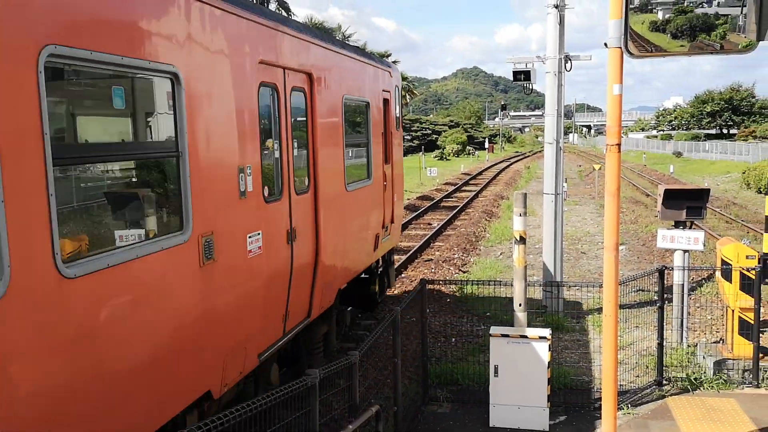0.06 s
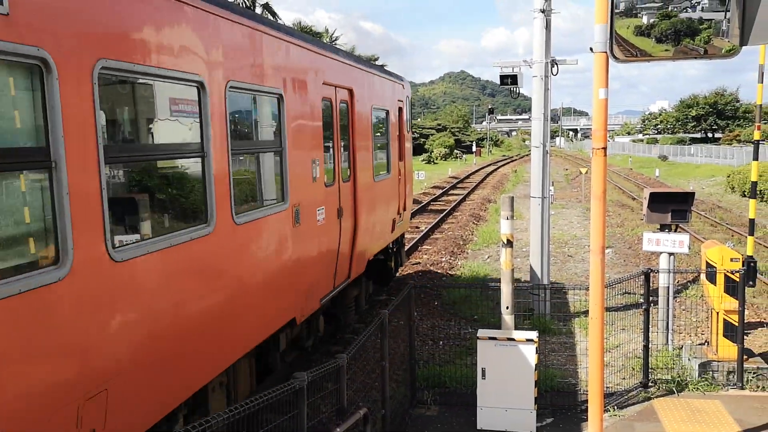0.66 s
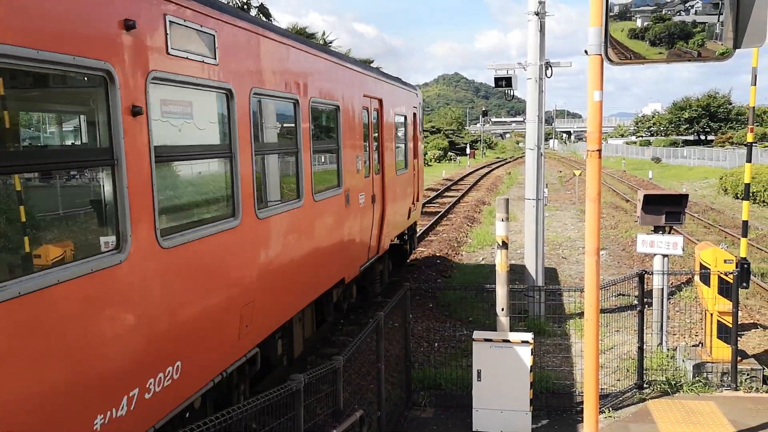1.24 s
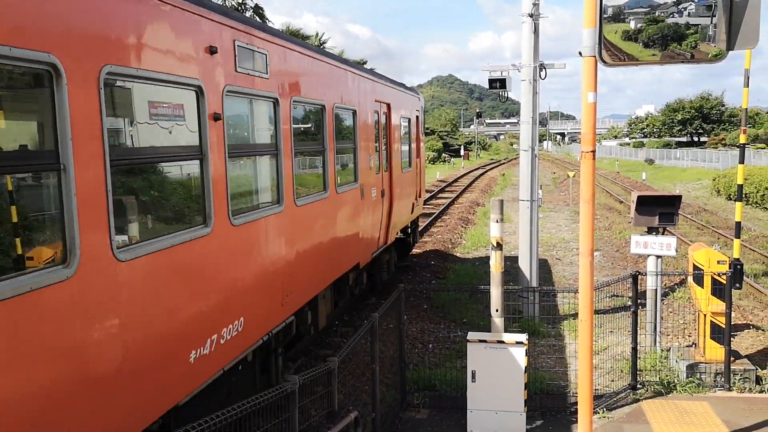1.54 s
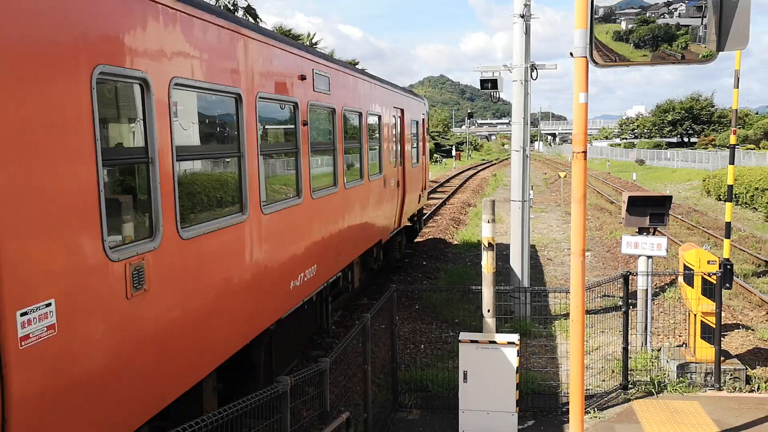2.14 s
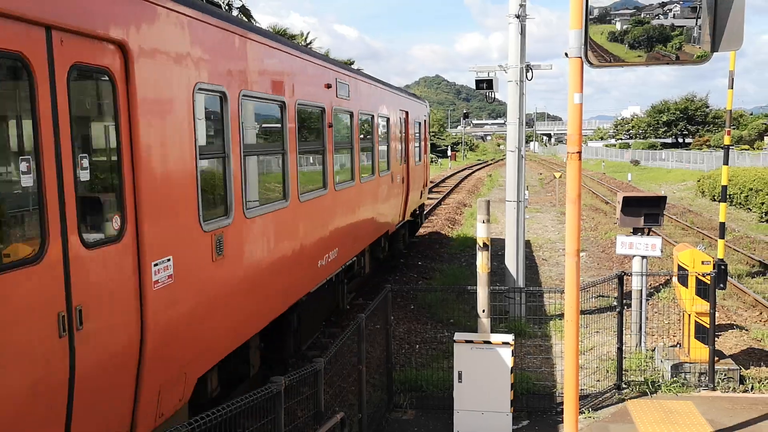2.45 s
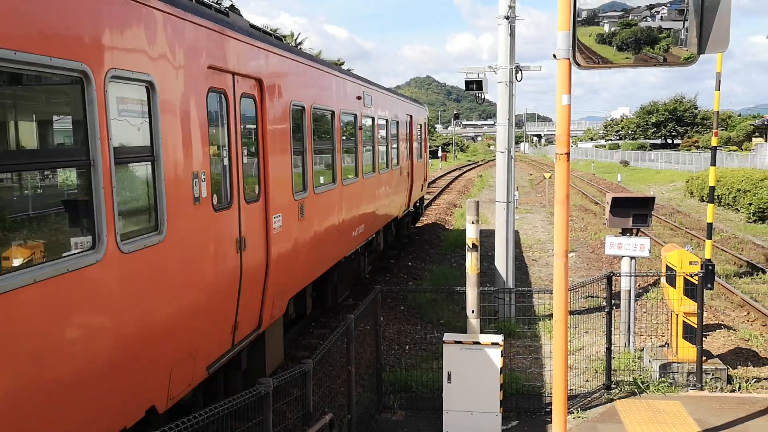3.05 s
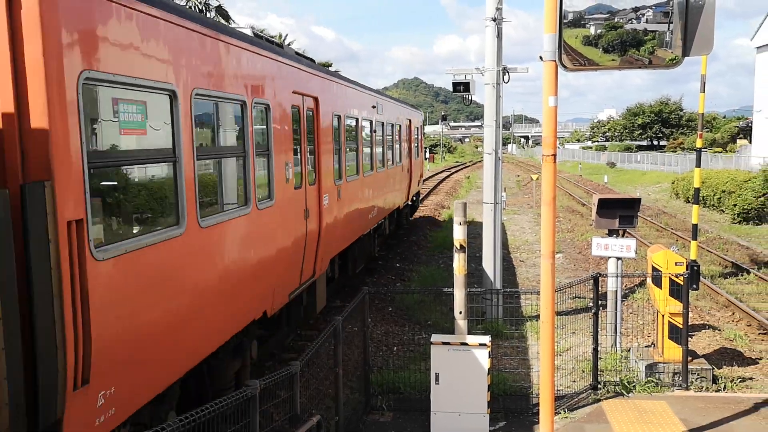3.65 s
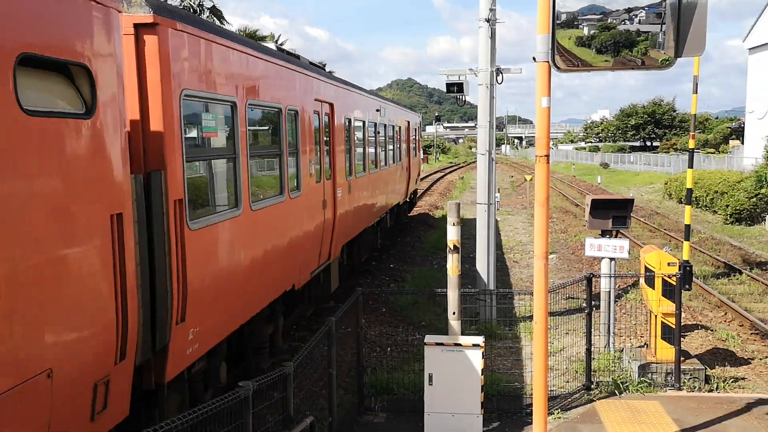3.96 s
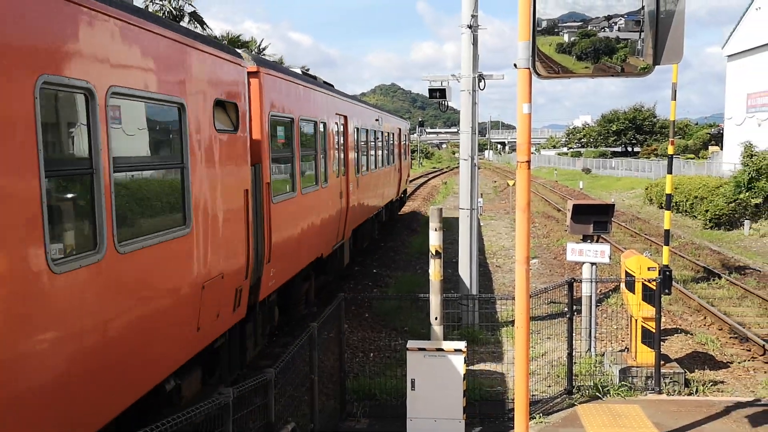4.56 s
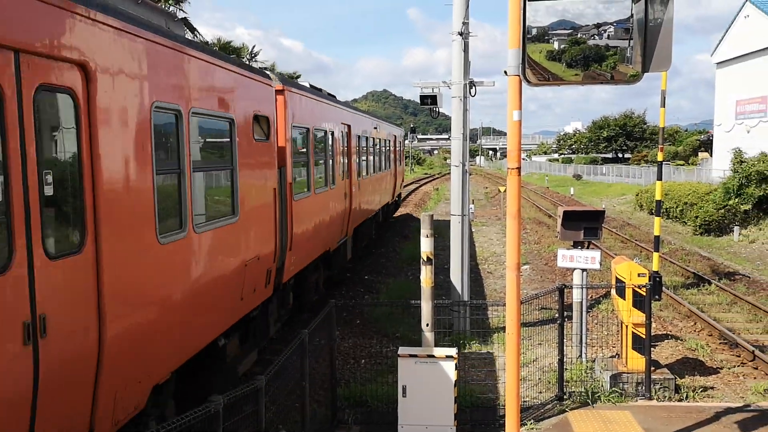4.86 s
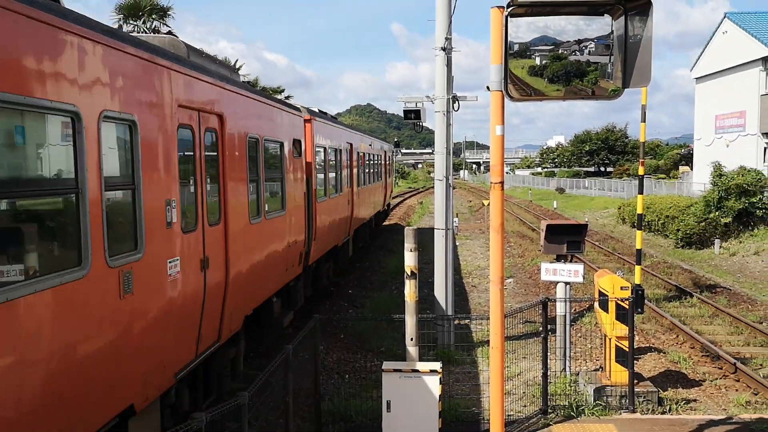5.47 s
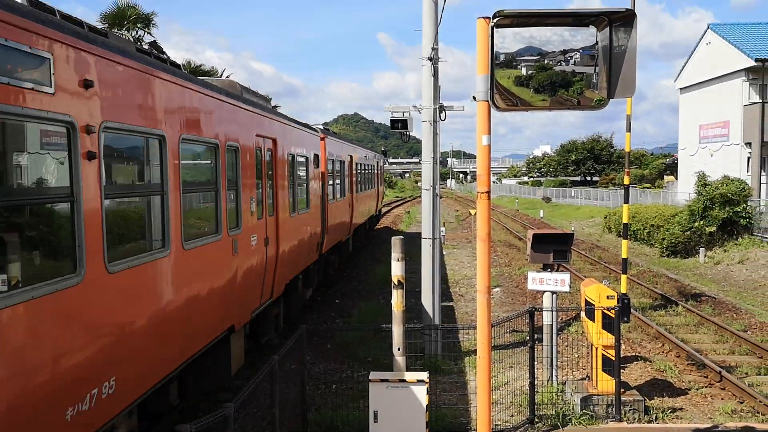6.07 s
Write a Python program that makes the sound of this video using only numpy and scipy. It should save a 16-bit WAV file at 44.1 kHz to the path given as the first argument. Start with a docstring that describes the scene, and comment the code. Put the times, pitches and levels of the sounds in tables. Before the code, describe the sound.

A diesel train pulls out close by, engines droning and rattling, wheels knocking and briefly squeaking, with wind buffeting the microphone.

```python
"""A station platform: a two-car diesel train pulls out, close by.
The two exhausts drone and beat against each other. Underfloor machinery roars, rattles and hisses
as each engine passes, gears whine and a turbocharger winds up. The wheels rumble and knock,
their flanges ring, scrape and squeak on the curve, and gusts of air buffet the microphone."""
import sys
import numpy as np
from scipy import signal
from scipy.fft import rfft, irfft, next_fast_len
from scipy.io import wavfile
from scipy.ndimage import uniform_filter1d, map_coordinates

SR = 44100
rng = np.random.default_rng(int(sys.argv[2]) if len(sys.argv) > 2 else 0)


def pcm_store(signal):
    """Save signal as 16-bit PCM."""
    levels = np.round(np.clip(np.atleast_2d(signal), -1, 1) * 32767)
    wavfile.write(sys.argv[1], SR, levels.astype(np.int16).T)


N = 278271
TIME_S = np.arange(N) / SR


# exhaust drone of each car: (time [s], level [dB])
FRONT_DRONE_DB = [(0, -16), (.8, -14), (1, -19), (1.3, -14.5), (2, -13), (3.45, -13.5), (4.15, -15.5),
                  (4.66, -20.5), (5, -15.5), (6.31, -21)]
REAR_DRONE_DB = [(0, -54), (2.3, -30), (4.25, -24), (4.66, -22), (5, -14.5), (5.75, -16), (6.31, -14)]
# outlets passing: (nearest [s], half-power time [s], harmonics [dB], boom [dB], throb [dB])
OUTLET_PASSES = [(.15, 0.12, -28.5, -48, -41), (.95, 0.22, -25, -29.5, -34), (1.7, .35, -28, -30.5, -37),
                 (4.4, 1.03, -29.5, -41.5, -43)]

def exhaust(firing):
    """Two firing tones beat; near an outlet, harmonics and uneven cylinders' boom and throb come in."""
    opposed_s, lag_hz, catch_up_hz_per_s = 5.165, 1.81, 0.29  # the rear engine is slower, but gaining
    since_s = TIME_S - opposed_s
    lag = np.pi + 2 * np.pi * (lag_hz * since_s - catch_up_hz_per_s * since_s ** 2 / 2)
    front = amp(curves(FRONT_DRONE_DB)[0]) * unit(np.cos(firing))
    rear = amp(curves(REAR_DRONE_DB)[0]) * unit(np.cos(firing - lag))
    harmonics_db, boom_db, throb_db = passing(OUTLET_PASSES)
    harmonics = sum(amp(db + 0.7 * wobble(8.5)) * np.cos(k * firing + 0.13 * wobble(6))
                    for k, db in [(2, 0), (3, -12), (4, -16)])
    boom = amp(boom_db - 2) * unit(np.cos(firing * 7 / 3 + 0.7 * wobble(9)))
    throb = amp(throb_db) * unit(sum(np.cos(firing * k / 6 + wobble(5)) for k in (5, 7)))
    drone = amp(0.45 * wobble(21.97)) * (front + rear)
    return drone + amp(harmonics_db - 0.5) * unit(harmonics) + boom + throb


# underfloor units passing: (nearest [s], half-power time [s], relative roar, rattle, hiss [dB])
UNIT_PASSES = [(.12, 0.31, -33.5, -30, -42), (1.0, 0.49, -35, -33.5, -45), (2.6, 0.75, -40, -35.5, -49.5),
               (3.55, 0.5, -47, -35.5, -54.5), (4.5, 0.48, -40.5, -35, -49.5), (5.29, 0.14, -33, -33, -46),
               (5.82, 0.18, -27.5, -25, -35), (6.27, .15, -30.5, -27.5, -35)]
# engine noise spectra: (frequency [Hz], relative density [dB])
FRONT_ROAR_DB = [(200, -24), (400, -8), (600, -8.5), (800, -1.5), (1050, 0), (1400, -0.5), (1800, -7),
                 (3000, -52), (8000, -120)]
REAR_ROAR_DB = [(200, -20), (400, -1), (620, -0.5), (800, 0), (1050, 2), (1400, -1), (1800, -5.5),
                (3000, -52), (8000, -120)]
FRONT_RATTLE_DB = [(820, -34), (1400, -12), (1720, 0), (2000, 1), (2400, -2), (2800, -9), (3300, -11.5),
                   (3700, -15), (4300, -19.5), (5000, -32), (6500, -45), (11000, -120)]
REAR_RATTLE_DB = [(820, -29), (1400, -15), (1650, -5.5), (2050, -3), (2400, 2.5), (2850, -3.5), (3150, -3),
                  (3500, -7), (3900, -9), (4400, -19), (5000, -13.5), (6500, -51), (11000, -120)]
GLANCING_HISS_DB = [(3000, -20), (4300, -4.5), (4900, 4), (5700, 2), (6250, -2.5), (7400, -1.5),
                    (8300, -10.5), (9300, -9.5), (10200, -13.5), (11900, -15), (13300, -23.5), (15000, -28)]
FACING_HISS_DB = [(3000, 2), (4300, -1.5), (5700, 3), (6300, -4.5), (7400, -2), (8300, -7), (10200, -11),
                  (12000, -5), (13300, -13), (15000, -31)]
# rear machinery tones: (frequency [Hz], relative level [dB])
REAR_TONES_DB = [(581, -47), (641, -46), (974, -49), (1241, -47), (2390, -39), (2590, -45), (3112, -47)]
# near engine: (frequency [Hz], L-R coherence [0..1])
NEAR_COHERENCE = [(250, .92), (600, .88), (850, .65), (1150, .88), (1500, .72), (2200, .82), (2700, .62),
                  (3200, .8), (4500, .5), (6500, .18), (14000, .15)]
# near engine: (frequency [Hz], L-R [dB])
NEAR_PAN_DB = [(300, -1), (750, 9), (1200, 2.5), (1600, 2.5), (2050, 1), (2600, -5.5), (4000, -1.5),
               (5700, 4), (9400, 4), (12000, 4.5)]

def machinery(firing):
    """Each engine roars, rattles and hisses as it passes, throbbing a little with the firings."""
    def blend(far_db, near_db, share):
        far = np.sqrt(1 - share) * noise(spectrum(far_db))
        return far + np.sqrt(share) * noise(spectrum(near_db), NEAR_COHERENCE)

    roar_db, rattle_db, hiss_db = passing(UNIT_PASSES)
    edge_on_db, facing_rise_db = -45.5, 15
    facing = np.clip((hiss_db - edge_on_db) / facing_rise_db, 0.08, 1)
    rear, = curves([(4.4, 0.084), (5.2, 0.89)])  # the rear engine draws level
    throb = unit(1 + 0.04 * np.cos(firing)) * amp(0.34 * wobble(14))
    roar = amp(roar_db + 2.5) * reflections(blend(FRONT_ROAR_DB, REAR_ROAR_DB, rear), depth_db=1.34)
    rattle_gain = amp(rattle_db + 5.5 + 0.21 * wobble(14))
    rattle = reflections(blend(FRONT_RATTLE_DB, REAR_RATTLE_DB, np.sqrt(facing * rear)), depth_db=1.58)
    hiss_gain = amp(hiss_db + 8 + 0.3 * wobble(24))
    hiss = reflections(blend(GLANCING_HISS_DB, FACING_HISS_DB, facing), depth_db=2)
    tones = sum(amp(db) * tone(phase(hz), scatter=0.98, flutter_hz=24) for hz, db in REAR_TONES_DB)
    sound = throb * (roar + rattle_gain * rattle + hiss_gain * hiss) + rear * amp(rattle_db + 31) * tones
    panned = filtered(sound, lambda hz: pan(log_interp(NEAR_PAN_DB, hz)))
    return (1 - rear) * sound + rear * panned


# gear mesh rate: (time [s], frequency [Hz])
MESH_HZ = [(0, 795), (1, 801), (2, 810), (3.2, 814), (3.9, 794), (5.3, 798), (6.31, 794)]
# gear whine: (time [s], relative mesh level [dB], relative octave level [dB])
WHINE_DB = [(0, -37.5, -32), (.6, -49, -34), (1.25, -40, -36.5), (1.9, -49.5, -36.5), (2.4, -44.5, -38),
            (3.5, -49.5, -47), (5, -46, -37.5), (5.6, -37, -40), (6.31, -54, -38)]
# gearboxes passing: (nearest [s], half-power time [s], relative level [dB])
GEARBOX_PASSES = [(.28, 0.035, -26), (.7, 0.066, -32), (5.23, 0.038, -24), (6.3, .05, -31)]

def gears():
    """Gears whine at the mesh rate and its rougher octave, which flares as a gearbox passes."""
    mesh_db, octave_db = curves(WHINE_DB)
    mesh = phase(curves(MESH_HZ)[0])
    octave_gain = amp(-1) * swells(GEARBOX_PASSES, octave_db) * pan(-0.81)
    octave = octave_gain * tone(2 * mesh, scatter=0.79, flutter_hz=80)
    return amp(mesh_db + 2.5) * tone(mesh, scatter=0.51, flutter_hz=35) + octave


# whistle pitch: (time [s], frequency [Hz])
WHISTLE_HZ = [(0, 5100), (1.7, 5165), (2.45, 5215), (3.55, 5340), (4.3, 5400), (5, 5447), (5.75, 5476),
              (6.31, 5450)]
# whistle strength: (time [s], level [dB], L-R [dB])
WHISTLE_DB = [(0, -72, 0), (2.6, -56, -2), (3.4, -47, -1), (3.85, -42, 4), (4.4, -42, 1), (4.95, -38, 4),
              (5.4, -47, 18), (5.85, -41, 13), (6.2, -48, -2)]
# whistle beaming at the platform: (time [s], half-power time [s], level [dB])
WHISTLE_FLARES = [(4.01, 0.043, -38), (4.66, 0.083, -34.5), (5.21, 0.071, -37.5), (5.78, 0.047, -37),
                  (6.125, 0.014, -29.5)]

def turbo():
    """The turbocharger's whistle climbs as it gathers speed, flickering in a narrow skirt of hiss."""
    level_db, pan_db = curves(WHISTLE_DB)
    blades = phase(curves(WHISTLE_HZ)[0] + 1.17 * wobble(24.93))
    gain = swells(WHISTLE_FLARES, level_db + 1.9 * wobble(12))
    whistle = tone(blades, scatter=0.18, flutter_hz=49)
    skirt = amp(-8) * tone(blades, scatter=5, flutter_hz=390)
    return gain * pan(pan_db) * (whistle + skirt)


# bogies passing: (nearest [s], half-power time [s], relative level [dB])
BOGIE_PASSES = [(.4, 0.26, -34.5), (1.25, 0.32, -35), (3.85, 0.32, -37), (4.4, 0.2, -36), (6.15, 0.21, -39)]
# rolling spectra: (frequency [Hz], relative density [dB])
RUMBLE_SPECTRUM_DB = [(50, -7.5), (110, 1.5), (170, -0.5), (270, -6), (350, -7), (450, -19), (560, -18.5),
                      (800, -32), (2000, -75), (5000, -120)]
ROLL_SPECTRUM_DB = [(150, -17), (380, -1.5), (600, -2), (900, -8), (2000, -37), (5000, -100)]

def wheels():
    """Steel wheels roll steadily on the rail; the rumble swells with each bogie."""
    rumble_gain = amp(6.5 + 1.8 * wobble(25)) * swells(BOGIE_PASSES, floor_db=-38)
    rumble = rumble_gain * noise(spectrum(RUMBLE_SPECTRUM_DB))
    return rumble + amp(-44.5) * noise(spectrum(ROLL_SPECTRUM_DB))


# wheel jolts: (time [s], relative level [dB], clank offset [dB], clank L-R [dB])
JOLTS = [(0.416, -10.5, -18, -11), (.63, -19, -24, 2), (0.81, -17, -20, 6), (1.422, -13, -36, -8),
         (1.668, -15, -10, -5), (3.729, -16, -10, -6), (3.753, -9.5, -9.5, -18), (3.833, -12.5, -5, -12),
         (3.885, -13.5, -17, -14), (4.113, -17, -4, 3), (4.154, -18.5, -13, 0), (4.468, -16.5, -28, -4),
         (4.579, -12.5, -6, 4), (5.591, -12.5, -15, 7), (5.996, -14, -15, -4)]
# bogie frame modes: (frequency [Hz], width [Hz], gain [dB])
BOGIE_MODES = [(106, 40, 5.5), (203, 170, -2), (273.6, 24.4, 1), (434, 78, -18.5)]
# clank spectrum: (frequency [Hz], relative density [dB])
CLANK_DB = [(100, 5.5), (300, 2.5), (550, -6.5), (1000, -9.5), (2000, -27), (6000, -52), (12000, -100)]

def knocks():
    """Each jolt of a wheel thumps the bogie, rebounds once and sets off a short dull clank."""
    attack_s, t60_s = 0.0013, 0.058
    blows, clank_gain = np.zeros(N), np.zeros((2, N))
    for start_s, db, clank_db, pan_db in JOLTS:
        blows[round((start_s + 0.004) * SR)] = amp(db)
        rebound_s = start_s + rng.uniform(0.012, 0.02)
        blows[round(rebound_s * SR)] = amp(db - 2.5)
        age_s = np.maximum(TIME_S - start_s, 0)
        attack = 1 - np.exp(-age_s / attack_s)
        clank_gain += pan(pan_db) * amp(db + clank_db - 60 * age_s / t60_s) * attack
    soft = lambda hz: 1 / (1 + 1j * hz / 900) ** 2  # a heavy wheel cannot strike sharply
    thump = amp(42) * filtered(blows, lambda hz: resonances(BOGIE_MODES, hz) * soft(hz))
    return thump + amp(6) * clank_gain * noise(spectrum(CLANK_DB))


# flange contacts: (time [s], half-power time [s], relative level [dB])
RINGS = [(2.05, 0.069, -42), (2.3, 0.1, -37.5), (2.7, 0.24, -42.5), (3.15, 0.2, -42)]
SCRAPES = [(3.78, 0.1, -37), (3.97, 0.18, -31)]
# wheel modes: (frequency [Hz], width [Hz], gain before squaring [dB])
WHEEL_MODES = [(2020, 250, -7), (2305, 66, 3), (3130, 320, -2), (3530, 200, -1), (3865, 140, -2)]

def flanges():
    """On the curve the flanges touch the rail, ringing with a stutter and scraping."""
    ring_gain = amp(3 * wobble(21.97) - 1) * swells(RINGS)
    ring = ring_gain * tone(phase(3370 + 25 * wobble(10)), scatter=1, flutter_hz=230)
    scrape_gain = amp(2.2 * wobble(30)) * swells(SCRAPES)
    return ring + scrape_gain * noise(lambda hz: np.abs(resonances(WHEEL_MODES, hz)) ** 2)


# flange grabs: (time [s], frequency [Hz], level [dB])
GRABS = [(3.815, 3300, -32), (3.875, 3200, -33), (3.92, 2330, -50), (3.955, 3180, -29), (3.96, 3620, -39),
         (4.04, 2020, -25.5)]

def squeaks():
    """A flange grabs the rail for a moment and one wheel mode sings."""
    return sum(amp(db) * np.exp(-((TIME_S - s) / 0.021) ** 2)
               * tone(phase(hz), scatter=0.68, flutter_hz=120) for s, hz, db in GRABS)


# gusts: (time [s], half-power time [s], relative level [dB])
AIR_GUSTS = [(.42, 0.32, -22.5), (1.27, .12, -23), (1.78, 0.2, -24), (2.65, 0.085, -28), (3.75, 0.12, -26),
             (4.03, 0.035, -25), (4.7, 0.56, -28), (5.05, 0.18, -31)]
# buffeting spectrum: (frequency [Hz], relative density [dB])
BUFFET_DB = [(12, 9), (25, 14), (48, 15), (70, 9), (110, 2.5), (170, -8), (300, -49), (900, -120)]

def wind():
    """Gusts over a steady breeze buffet the microphone."""
    return amp(3.5) * swells(AIR_GUSTS, floor_db=-37) * noise(spectrum(BUFFET_DB))


# port balance: (frequency [Hz], L-R [dB])
PORT_PAN_DB = [(250, 0), (380, 0), (520, 2), (740, 6), (1000, 1.5), (1250, -2), (1550, -8), (2000, -3),
               (2600, -2), (4500, 2), (5700, -2), (7300, -2.5), (9400, 2), (12000, -8), (14500, -3)]
# left port's lead: (frequency [Hz], phase [rad])
PORT_LEAD_RAD = [(30, 0), (72, 0.06), (170, 0.41), (300, 0.8), (550, 2), (800, 1.6), (950, 1.05),
                 (1380, 1.15), (1900, 3), (2500, 4), (3100, 5.5), (3600, 6), (4570, 8), (5450, 11.5),
                 (14000, 25)]

def microphone_ports(pair):
    """Sound reaches the left port first, and the housing colours each side differently."""
    lead = lambda hz: np.exp(1j * log_interp(PORT_LEAD_RAD, hz) * np.array([[0.5], [-0.5]]))
    return filtered(pair, lambda hz: pan(log_interp(PORT_PAN_DB, hz)) * lead(hz))


# sound from along the track: (frequency [Hz], L-R coherence [0..1])
TRACK_COHERENCE = [(60, 0.93), (170, 0.9), (450, 0.53), (780, 0.4), (1150, 0.68), (1600, 0.29),
                   (2100, 0.55), (3000, 0.32), (4000, 0.39), (6500, 0.058), (14000, 0.092)]

def noise(response, coherence=TRACK_COHERENCE):
    """Stereo noise of rms 1, alike on both sides in the bass and diffuse in the treble."""
    def mid_side(hz):
        spread_rad = np.arccos(np.clip(log_interp(coherence, hz), -1, 1)) / 2
        return response(hz) * np.array([np.cos(spread_rad), np.sin(spread_rad)])

    mid, side = filtered(rng.standard_normal((2, N)), mid_side)
    return unit(np.array([mid + side, mid - side]))


def reflections(x, depth_db):
    """Shifting reflections between car and ground lift and sink patches of the spectrum; rms 1."""
    frames = signal.stft(x, nperseg=1024)[2]
    patches = uniform_filter1d(rng.standard_normal(frames.shape[1:]), size=3, axis=0)
    patches = unit(uniform_filter1d(patches, size=22, axis=1))
    return unit(signal.istft(frames * amp(depth_db * patches), nperseg=1024)[1][:, :N])


def tone(phase_rad, scatter, flutter_hz):
    """Stereo tone of rms 1: a direct part plus a scattered part that flutters at each port."""
    flutter = np.array([wobble(flutter_hz) + 1j * wobble(flutter_hz) for _ in range(2)])
    return unit(np.real((1 + scatter * flutter) * np.exp(1j * phase_rad)))


def passing(rows):
    """One dB curve per level column: sources fade with distance as the car body hides them."""
    nearest_s, half_s, *levels_db = np.transpose(rows)
    t = np.linspace(0, N / SR, 1000)
    nearness = 1 / (1 + np.abs((t[:, None] - nearest_s) / half_s) ** 2.22)
    return curves(np.column_stack([t] + [10 * np.log10(nearness @ amp(db) ** 2) for db in levels_db]))


def swells(rows, floor_db=-100):
    """Gain of bell-shaped swells over a floor."""
    power = sum(amp(db) ** 2 * 0.5 ** (((TIME_S - s) / half_s) ** 2) for s, half_s, db in rows)
    return np.sqrt(amp(floor_db) ** 2 + power)


def resonances(modes, hz):
    """Causal response of modes of alternating sign."""
    return sum((-1) ** k * amp(db) * 1j * hz * width / (centre ** 2 - hz ** 2 + 1j * hz * width)
               for k, (centre, width, db) in enumerate(modes))


def filtered(x, response):
    """Apply a complex frequency response."""
    size = next_fast_len(N + SR // 2)
    return irfft(rfft(x, size) * response(np.fft.rfftfreq(size, 1 / SR)), size)[..., :N]


def spectrum(points):
    """Frequency response from dB points."""
    return lambda hz: amp(log_interp(points, hz))


def log_interp(points, hz):
    """Points read on a log frequency axis."""
    knots_hz, values = np.transpose(points)
    return np.interp(np.log(hz + 1), np.log(knots_hz + 1), values)


def curves(rows):
    """One value per sample for each column after the time."""
    knots_s, *columns = np.transpose(rows)
    return [np.interp(TIME_S, knots_s, column) for column in columns]


def wobble(rate_hz):
    """Smooth random curve, rate_hz knots a second."""
    return map_coordinates(rng.standard_normal(int(N * rate_hz / SR) + 4), [TIME_S * rate_hz])


def pan(db):
    """Constant-power gains for an L-R level difference."""
    gains = amp(db * np.array([[0.5], [-0.5]]))
    return gains / np.sqrt(np.mean(gains ** 2, axis=0))


def phase(hz):
    """Running phase in radians."""
    return 2 * np.pi * np.cumsum(hz * np.ones(N)) / SR


def amp(db):
    """Decibels to gain."""
    return 10 ** (np.asarray(db) / 20)


def unit(x):
    """Scale to rms 1."""
    return x / np.sqrt(np.mean(x ** 2) + 1e-20)


# front engine's cylinder firings: (time [s], rate [Hz])
FIRING_HZ = [(0, 70.6), (1, 71), (2, 71.9), (3, 72.4), (4.5, 73), (6.31, 73.2)]

def scene():
    """Drive, running gear and wind, all heard through the two ports."""
    firing = phase(curves(FIRING_HZ)[0])
    drive = exhaust(firing) + machinery(firing) + gears() + turbo()
    running_gear = wheels() + knocks() + flanges() + squeaks()
    return microphone_ports(drive + running_gear + wind())


def record(dry):
    """Brick-wall low-pass."""
    return filtered(dry, lambda hz: hz < 15120)


dry = scene()
out = record(dry)
pcm_store(out)
```